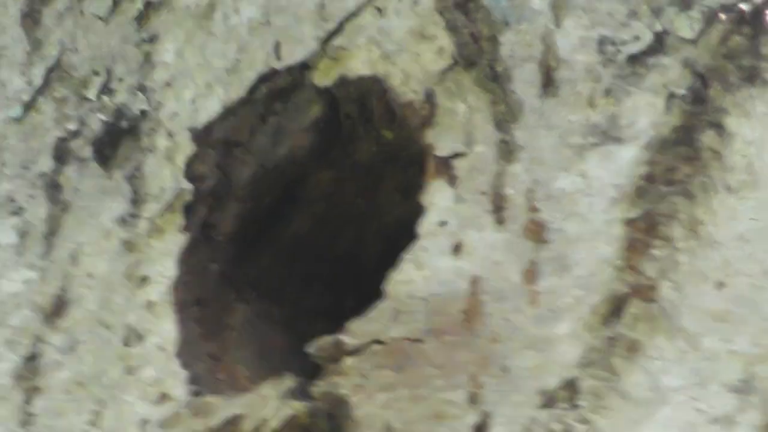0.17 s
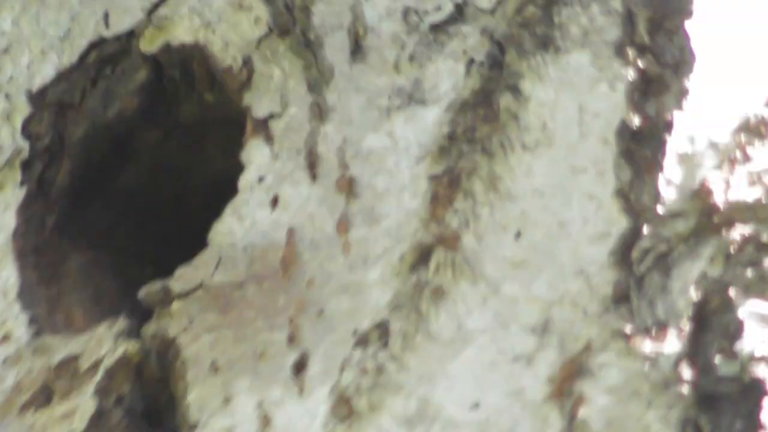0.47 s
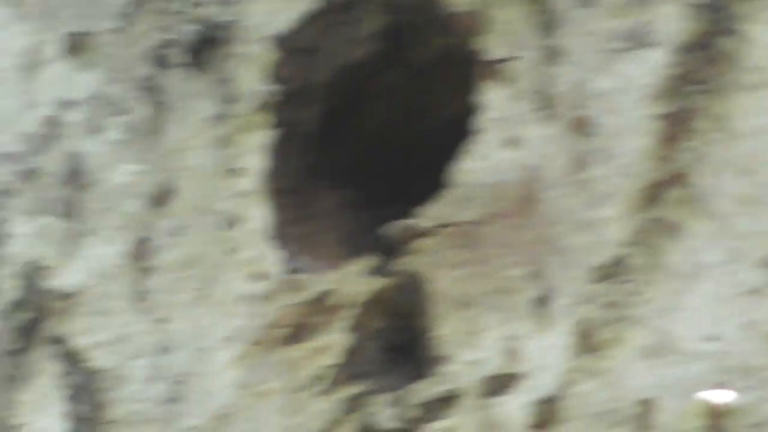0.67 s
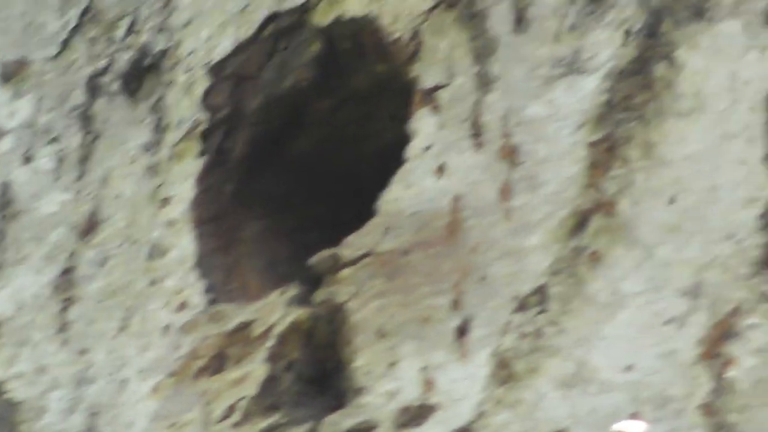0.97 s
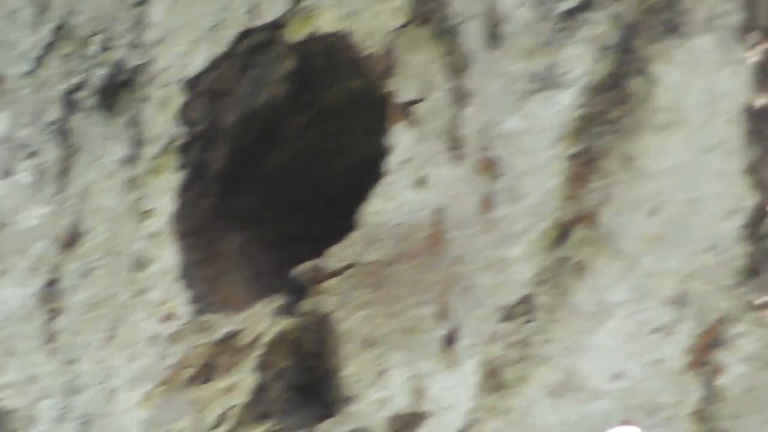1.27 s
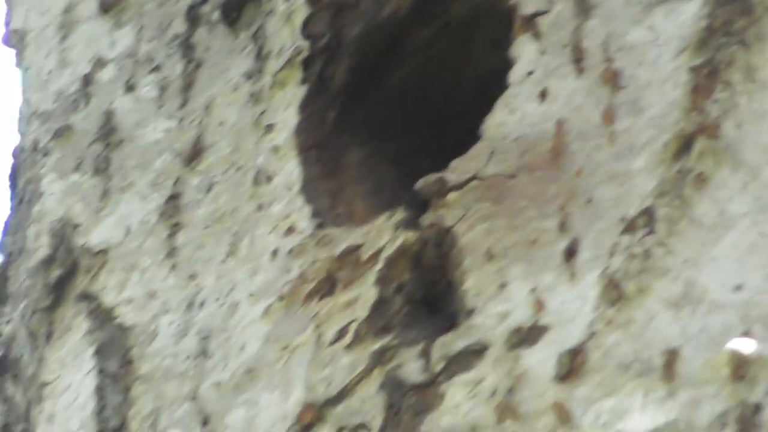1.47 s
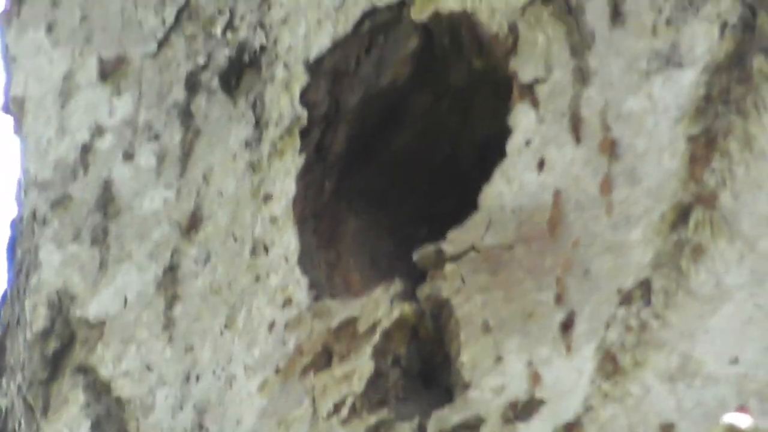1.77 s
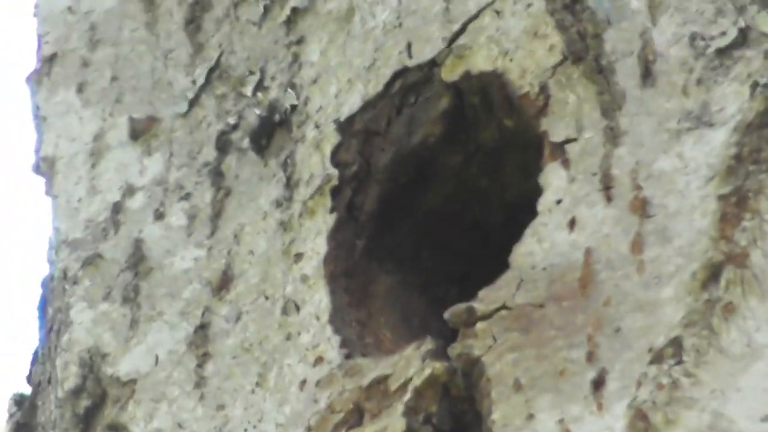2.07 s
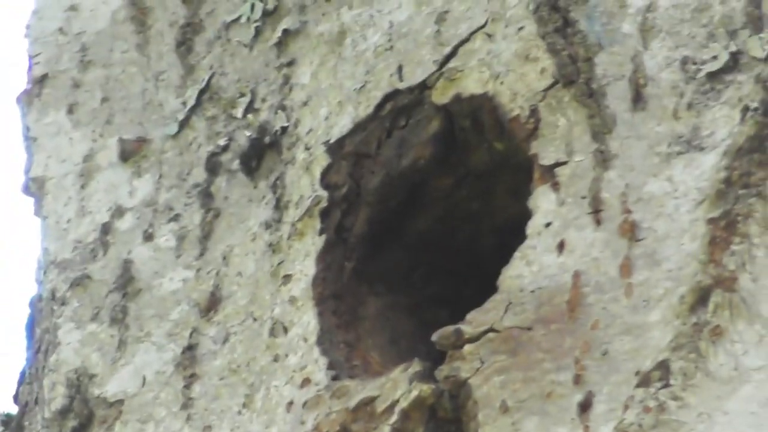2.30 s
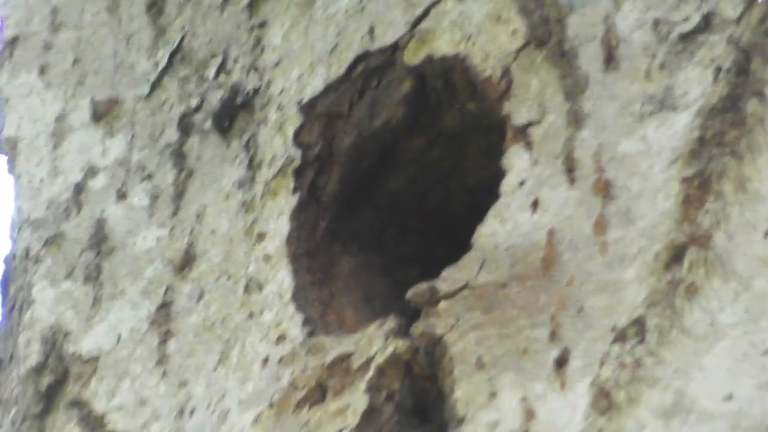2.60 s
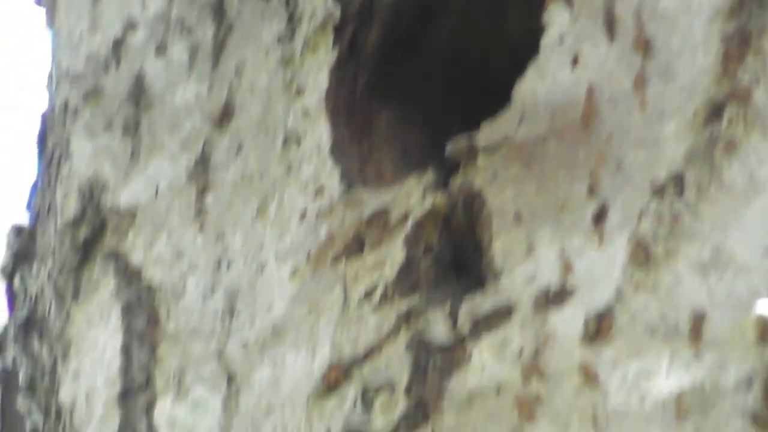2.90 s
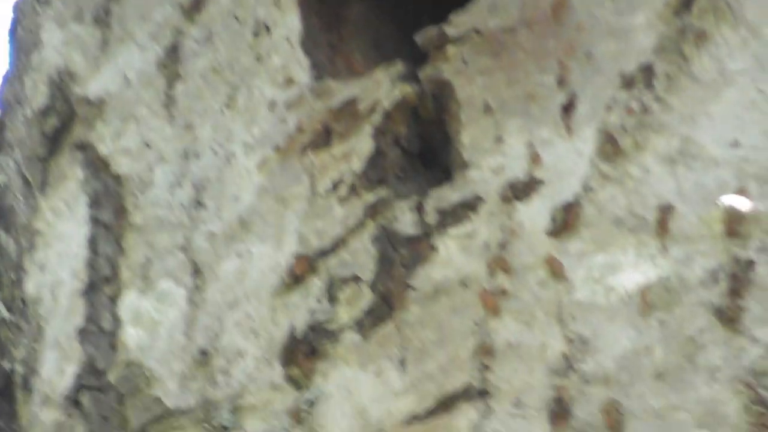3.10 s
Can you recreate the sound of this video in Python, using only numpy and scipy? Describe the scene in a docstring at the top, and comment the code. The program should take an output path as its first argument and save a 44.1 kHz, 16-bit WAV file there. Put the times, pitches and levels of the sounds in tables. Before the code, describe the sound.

A woodpecker chick in a tree hole begs throughout, from 0 to about 3.2 seconds: sharp, bright, squeaky cries near 3 kHz, each under a tenth of a second, five per second, flipping upward, sagging and dropping. Short scattered reflections follow, and the cries soften slightly. A nest mate gives hoarse chirps near 0.6 and 2.1 seconds. Faint distant birds call and whistle over soft woodland hiss.

```python
"""A woodpecker chick begs five times a second from a tree hole, heard from close by.
Each cry is a stack of harmonics that starts low, flips up a register, sags and drops;
scattered reflections from hole, trunk and trees throw it back. A nest mate chirps twice in hoarse arches.
Far birds call in narrow noise bands and thin tones, and the wood hisses softly in shaped noise."""
import sys
import numpy as np
from scipy import signal
from scipy.fft import rfft, irfft
from scipy.io import wavfile
from scipy.ndimage import uniform_filter1d

SR = 44100
rng = np.random.default_rng(int(sys.argv[2]) if len(sys.argv) > 2 else 0)


def voltage_ratio(level):
    """Linear amplitude factor for a level in decibels (scalar or array-like)."""
    return 10 ** (np.asarray(level, float) / 20)


def wav_record(signal):
    """Record a signal, one row per channel, as 16-bit PCM in the file named by sys.argv[1]."""
    frames = np.transpose(np.atleast_2d(signal))
    bounded = np.clip(frames, -1, 1)
    # unit amplitude maps onto the largest positive 16-bit level
    quanta = np.round(bounded * 32767).astype(np.int16)
    wavfile.write(sys.argv[1], SR, quanta)


N = 143325
LEAD = 8820  # samples rendered before time zero, for sounds already under way

# hiss of the wood, relative spectrum: hz, level_db (per Hz)
AIR_SPECTRUM = [(15, -66), (25, -35), (584, -21.5), (922, -9.5), (1540, -15.5), (2240, -10), (2640, -9.5),
                (5030, -12.5), (5600, -13.5), (6410, -6.5), (7140, -6.5), (9100, -17.5), (11600, -21),
                (12900, -25.5), (15600, -30)]
AIR_DB, PATCHY_DB = -55.5, 2.12  # rms level of the hiss; rms depth of its patches
# low rumble swelling and easing: time_s, boost_db (below 700 Hz)
RUMBLE_SWELL = [(0, 3.5), (.7, 2), (1.4, 0.5), (2.4, 1.5), (3.25, 0.5)]

# low far murmurs of the wood: start_s, length_s, level_db, centre_hz
MURMURS = [(0.403, 0.084, -62, 944), (1.55, 0.2, -65.5, 859), (1.829, 0.044, -61.5, 900),
           (2.199, 0.09, -66, 799), (2.958, .08, -65, 950)]
MURMUR_WIDTH_HZ = 310
# far hoarse birds: start_s, length_s, level_db, pitch_hz
HOARSE_CALLS = [(-.12, 0.15, -56.5, 2080), (0.441, 0.29, -58.5, 2100), (1.089, 0.19, -60.5, 2050),
                (1.63, 0.24, -60, 2100), (2.26, 0.23, -56.5, 2117), (2.803, .2, -59, 2086),
                (1.13, 0.16, -56.5, 3390), (1.301, .27, -60, 3246), (1.88, 0.21, -64, 3450),
                (0.425, 0.18, -62.5, 3440), (2.505, 0.12, -64, 3430)]
HOARSE_WIDTH_HZ = 280
# far whistling bird: start_s, length_s, level_db, first_hz, last_hz
WHISTLE_NOTES = [(.74, .3, -62, 3530, 3390), (1.03, .09, -66, 3130, 3080), (1.36, .14, -66, 2780, 2740),
                 (2.07, .05, -63, 3250, 3240), (.84, .12, -63, 3900, 4400)]

# relative strength of the reflections: delay_s, level_db
ECHO_DECAY = [(.001, -30), (.012, 12.5), (.02, -2.5), (.03, 1), (.038, -1), (.1, -23.5), (.2, -21.5),
              (.4, -53), (.7, -69)]
# colour of the reflections: hz, gain_db
ECHO_COLOUR = [(1500, -7), (4300, -1.5), (5600, 5.5), (8800, -0.5), (10000, -4.5), (15000, -6)]
ECHO_DB = -4

# nest mate: start_s, length_s, level_db (before the harmonic levels), top_pitch_hz
MATE_CHIRPS = [(0.612, 0.044, -43.5, 1154), (2.109, .034, -41, 1161)]
# nest mate's harmonics, from the fundamental up: level_db
MATE_HARMONICS = [-24, -8.5, -8, -5.5, -33, -15, -21, -11]
CHIRP_ARCH, CHIRP_TOP = 0.39, 0.41  # pitch fall at both ends and place of the peak, as fractions
CHIRP_RASP, CHIRP_WET_DB = .36, 9.5  # rms roughness of each harmonic; extra send to the echoes

# begging cries: flip_s, low_part_s, high_part_s, level_db (before the voice's colour), high_pitch_hz
BEGGING_CRIES = [(-.072, 0.01, 0.039, -35, 2916), (0.125, 0.025, 0.04, -34.5, 2940),
                 (0.339, 0.02, .036, -34.5, 2907), (.539, .015, 0.042, -36, 2898),
                 (.741, 0.026, 0.034, -36, 2866), (0.95, .028, 0.032, -36, 2880),
                 (1.144, 0.023, 0.035, -36.5, 2890), (1.351, .02, 0.028, -36.5, 2896),
                 (1.544, .026, .037, -37, 2880), (1.753, 0.022, 0.03, -36, 2896),
                 (1.952, 0.025, 0.032, -37, 2874), (2.158, .03, .031, -37.5, 2870),
                 (2.353, 0.02, 0.032, -37.5, 2859), (2.545, 0.021, .037, -37.5, 2866),
                 (2.751, 0.029, 0.027, -38, 2863), (2.947, 0.023, 0.034, -38.5, 2874),
                 (3.138, 0.021, 0.032, -38.5, 2886)]
# effort around the final drop: time_s (from the end of the high part), gain_db
DROP_EFFORT = [(-.02, 0), (-.004, -3), (.004, -4), (.009, -7), (.014, -15), (.022, -40)]
# harmonics at the syrinx, from the fundamental up: level_db
SYRINX_HARMONICS = [-5, 3.5, 4.5, -9.5, -6.5, -4]
# resonances of throat, beak and hole: hz, gain_db
BEAK_COLOUR = [(1500, 5.5), (2300, -7), (2900, -14.5), (3700, -2), (4200, -8), (4700, -20.5), (5700, -12.5),
               (6400, -8.5), (7200, -2.5), (7800, -2), (8500, -7.5), (9500, 7), (10500, 3), (11500, 1),
               (12500, -10), (13300, -17), (14500, -19), (16000, -35)]
# the low pitch bottoms out about DIP_S after the opening, then climbs toward the flip
DIP_S, CLIMB, ONSET_LIFT, CLIMB_POWER = .007, .075, .07, 1.5
FLIP_S, LOW_RATIO = .0035, .797  # length of the flip; low register over high
SAG, SAG_POWER = .1, 2.223  # fraction of pitch lost over the high part; bend of that curve
DROP_S, END_HZ, END_HOLD_S, FALL_HZ_PER_S = .004, 2150, .003, 42000
LOW_DB, FLIP_DB = -1.5, 1
ATTACK_S, ATTACK_DB = .007, -15
WHISPER_DB, WHISPER_S = -20, .012  # faint lead-in
CRACK_DB = -8  # the voice cracks noisily as it opens
CLOSING_DB = -9  # each harmonic above the second loses this much more once the pitch drops
FLUTTER_DB, WOBBLE, BREATH_DB = 2.5, .003, -17  # rms; wobble is a fraction of pitch


def evened(x):
    """Scales to unit rms."""
    return x / np.sqrt(np.mean(x ** 2) + 1e-20)


def read(points, hz):
    """Reads a spectrum table on a log frequency axis."""
    f, value = np.transpose(points)
    return np.interp(np.log(hz + 1), np.log(f + 1), value)


def add(mix, s, sound):
    """Mixes a sound in at s seconds."""
    part = mix[LEAD + round(s * SR):][:len(sound)]
    part += sound[:len(part)]


def drift(count, size):
    """Smooth random motion of unit rms; a larger size in samples moves more slowly."""
    once = uniform_filter1d(rng.standard_normal(count), size)
    return evened(uniform_filter1d(once, size))


def air():
    """The hiss of the wood: noise shaped in frequency, with drifting patches and a moving rumble."""
    frames, hz = N // 256 + 5, np.fft.rfftfreq(1024, 1 / SR)
    real, imaginary, patches = rng.standard_normal((frames, 513, 3)).T
    patches = uniform_filter1d(patches, size=10, axis=0)  # across frequency
    patches = evened(uniform_filter1d(patches, size=16, axis=1))  # across time
    frame_s = np.arange(frames) * 256 / SR
    swell = np.outer(hz < 700, np.interp(frame_s, *np.transpose(RUMBLE_SWELL)))
    shape_db = read(AIR_SPECTRUM, hz)[:, None] + PATCHY_DB * patches + swell
    hiss = signal.istft((real + 1j * imaginary) * voltage_ratio(shape_db), nperseg=1024, noverlap=768)[1][:N]
    return voltage_ratio(AIR_DB) * evened(hiss)


def far_voice(start, length, db, hz, width_hz):
    """A swelling narrow band of noise around a pitch: a voice blurred by distance."""
    t = np.arange(0, length, 1 / SR)
    lowpass = signal.butter(2, width_hz / 2, fs=SR, output="sos")
    a, b = signal.sosfilt(lowpass, rng.standard_normal((2, 13000)))[:, :len(t)]
    band = a * np.cos(2 * np.pi * hz * t) + b * np.sin(2 * np.pi * hz * t)
    return start, voltage_ratio(db) * np.sin(np.pi * t / length) ** .5 * evened(band)


def whistle(start, length, db, first_hz, last_hz):
    """A thin, flickering tone that settles toward its last pitch."""
    t = np.arange(0, length, 1 / SR)
    glide = last_hz + (first_hz - last_hz) * np.exp(-5 * t / length)
    hz = glide + 14 * drift(count=14000, size=400)[:len(t)]
    flicker = voltage_ratio(2.5 * drift(count=14000, size=500)[:len(t)])
    swell = np.sin(np.pi * t / length) ** .5
    return start, voltage_ratio(db) * flicker * swell * np.cos(2 * np.pi * np.cumsum(hz) / SR)


def echoes(x):
    """Sparse reflections of random sign from hole, trunk and trees, coloured and fading with delay."""
    taps = np.zeros(30000)
    at = np.arange(40, 29980, 14) + rng.integers(0, 14, 2139)  # one reflection in every 14 samples
    strength = voltage_ratio(np.interp(at / SR, *np.transpose(ECHO_DECAY)))
    taps[at] = rng.choice([-1., 1.], len(at)) * strength
    colour = voltage_ratio(read(ECHO_COLOUR, np.fft.rfftfreq(len(taps), 1 / SR)))
    tail = irfft(rfft(taps / np.linalg.norm(taps)) * colour)
    return voltage_ratio(ECHO_DB) * signal.fftconvolve(x, tail)[:len(x)]


def chirp(start, length, db, top_hz):
    """A short arch of harmonics, rising quicker than it falls, each roughened by its own noise."""
    u = np.arange(0, length, 1 / SR) / length
    off_peak = np.where(u < CHIRP_TOP, 1 - u / CHIRP_TOP, (u - CHIRP_TOP) / (1 - CHIRP_TOP))
    phase = 2 * np.pi * np.cumsum(top_hz * (1 - CHIRP_ARCH * off_peak ** 1.7)) / SR
    voice = np.zeros(len(u))
    for k, harmonic_db in enumerate(MATE_HARMONICS, 1):
        rasp = 1 + CHIRP_RASP * drift(count=3000, size=14)[:len(u)]
        voice += voltage_ratio(harmonic_db) * rasp * np.cos(k * phase)
    return start, voltage_ratio(db) * np.sin(np.pi * u) ** .4 * voice


def cry_pitch(t, low_s, high_s, high_hz):
    """Pitch of the syrinx in Hz, with how far it has flipped up and dropped down (0 to 1)."""
    dip = np.maximum(1 + t / max(low_s - DIP_S, .009), -.5)  # zero at the lowest point, one at the flip
    bend = np.where(dip > 0, CLIMB, ONSET_LIFT) * abs(dip) ** CLIMB_POWER
    low = high_hz * LOW_RATIO * (1 + bend)
    high = high_hz * (1 - SAG * np.clip(t / high_s, 0, 2) ** SAG_POWER)
    end = END_HZ - FALL_HZ_PER_S * np.maximum(t - high_s - DROP_S - END_HOLD_S, 0)
    up = np.clip(t / FLIP_S + .5, 0, 1)
    down = np.clip((t - high_s) / DROP_S, 0, 1)
    hz = ((1 - up) * low + up * high) * (1 - down) + down * end
    return hz * (1 + WOBBLE * drift(count=len(t), size=60)), up, down


def cry(flip, low_s, high_s, db, high_hz):
    """A begging cry: breathy syrinx harmonics, coloured by throat, beak and hole as the pitch moves."""
    t = np.arange(5200) / SR - .045  # seconds from the flip
    hz, up, down = cry_pitch(t, low_s, high_s, high_hz)
    unopened = np.maximum(1 - (t + low_s) / ATTACK_S, 0)
    whisper = voltage_ratio(WHISPER_DB) * np.exp(-unopened * ATTACK_S / WHISPER_S)
    opening = voltage_ratio(ATTACK_DB * unopened) + whisper
    crack = voltage_ratio(CRACK_DB) * np.exp(-(2 * unopened - 1) ** 2 * 4)  # strongest halfway through the attack
    effort_db = np.interp(t - high_s, *np.transpose(DROP_EFFORT))
    register_db = LOW_DB * (1.5 - up) + FLIP_DB * np.exp(-(t / FLIP_S) ** 2)
    level = opening * voltage_ratio(db + effort_db + register_db)
    phase = 2 * np.pi * np.cumsum(hz) / SR
    tone = np.zeros(len(t))
    for k, fold_db in enumerate(SYRINX_HARMONICS, 1):
        closing_db = CLOSING_DB * max(k - 2, 0) * down
        flutter_db = FLUTTER_DB * drift(count=len(t), size=70)
        strength = voltage_ratio(fold_db + read(BEAK_COLOUR, k * hz) + closing_db + flutter_db)
        breath = 1 + (voltage_ratio(BREATH_DB) + crack) * drift(count=len(t), size=7)
        tone += strength * breath * np.cos(k * phase + 2 * np.pi * rng.random())
    return flip + t[0], level * tone


def scene():
    """Lays the nest and its echoes over far birds, murmurs and air."""
    nest, mate, far = np.zeros((3, N + LEAD))
    for row in MURMURS:
        add(far, *far_voice(*row, MURMUR_WIDTH_HZ))
    for row in HOARSE_CALLS:
        add(far, *far_voice(*row, HOARSE_WIDTH_HZ))
    for row in WHISTLE_NOTES:
        add(far, *whistle(*row))
    for row in MATE_CHIRPS:
        add(mate, *chirp(*row))
    for row in BEGGING_CRIES:
        add(nest, *cry(*row))
    hole = nest + mate + echoes(nest + voltage_ratio(CHIRP_WET_DB) * mate)
    hole = signal.sosfilt(signal.butter(4, 1000, "high", fs=SR, output="sos"), hole)
    return ((hole + far)[LEAD:] + air())[None]


def roll_off(x):
    """The treble ends steeply here."""
    return signal.sosfilt(signal.butter(12, 15740, fs=SR, output="sos"), x)


def record(dry):
    """Delivers the finished mix."""
    return roll_off(dry)


dry = scene()
out = record(dry)
wav_record(out)
```